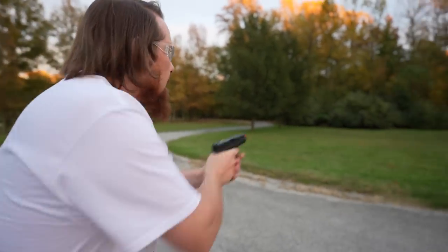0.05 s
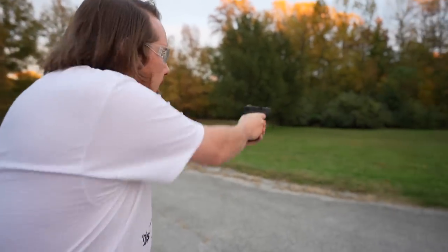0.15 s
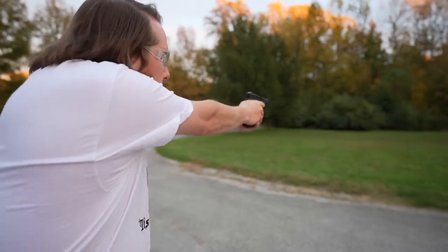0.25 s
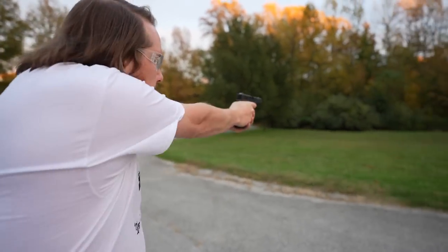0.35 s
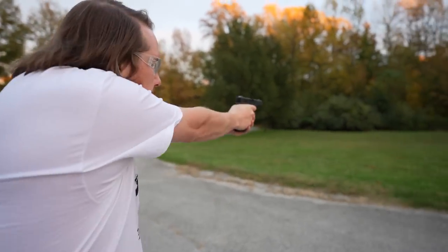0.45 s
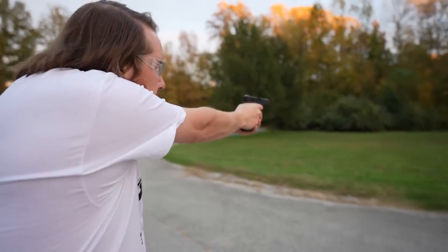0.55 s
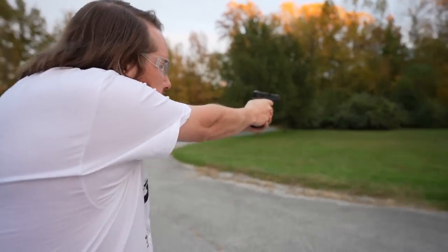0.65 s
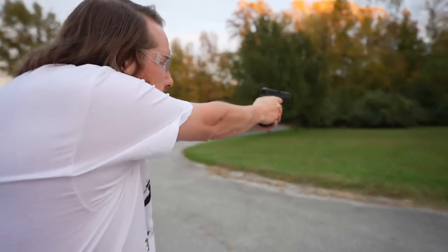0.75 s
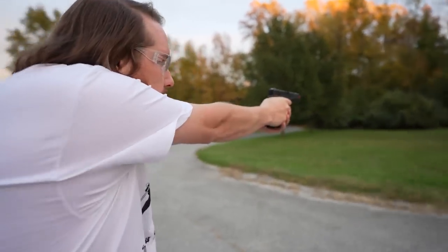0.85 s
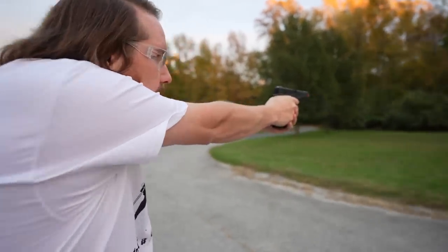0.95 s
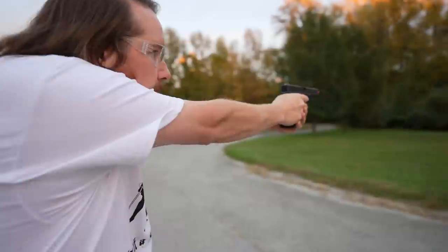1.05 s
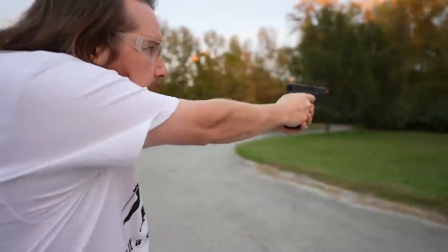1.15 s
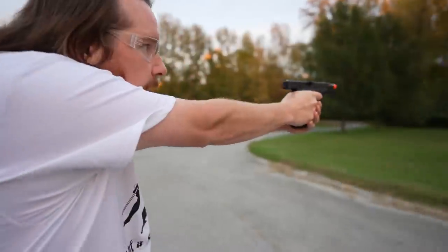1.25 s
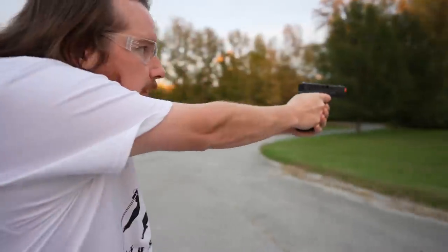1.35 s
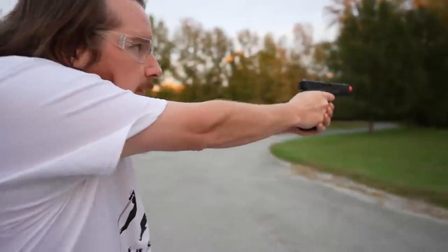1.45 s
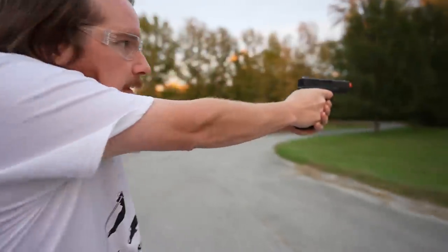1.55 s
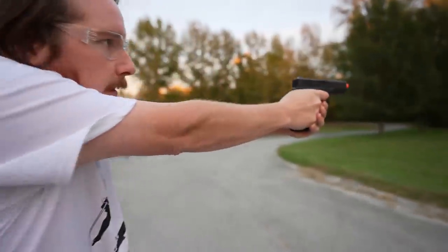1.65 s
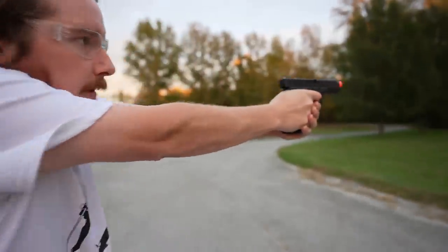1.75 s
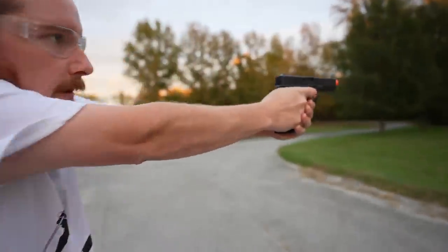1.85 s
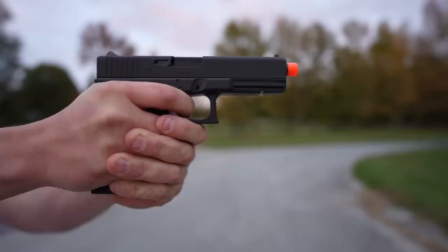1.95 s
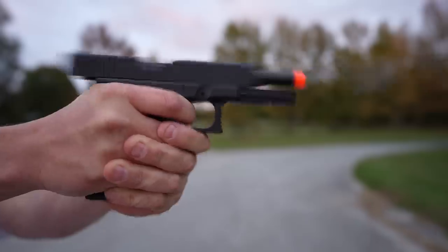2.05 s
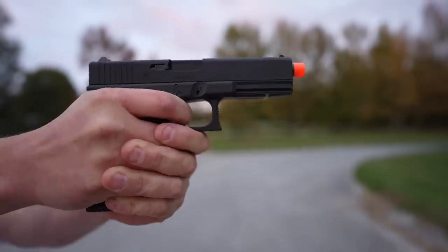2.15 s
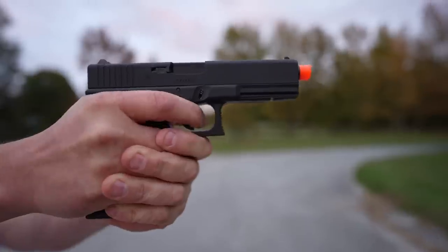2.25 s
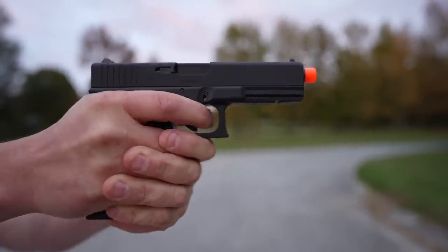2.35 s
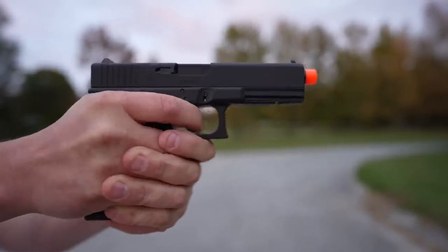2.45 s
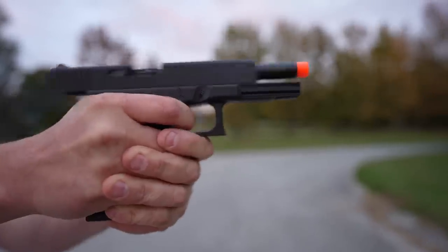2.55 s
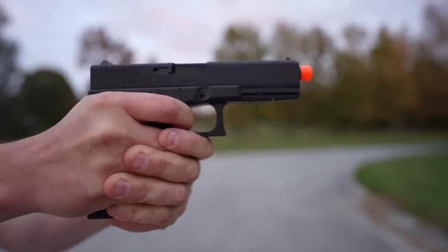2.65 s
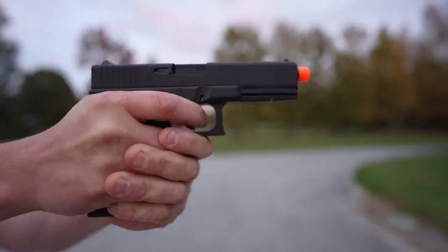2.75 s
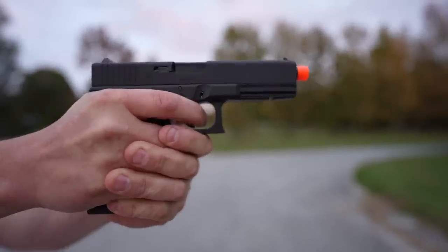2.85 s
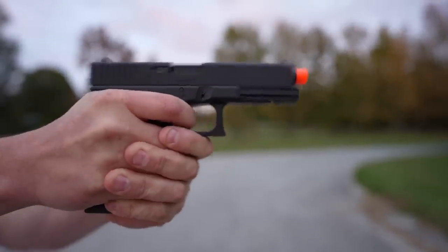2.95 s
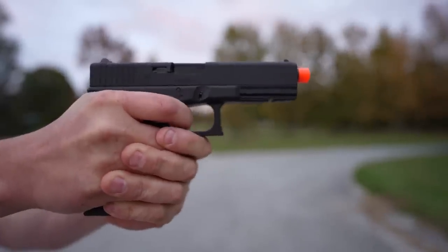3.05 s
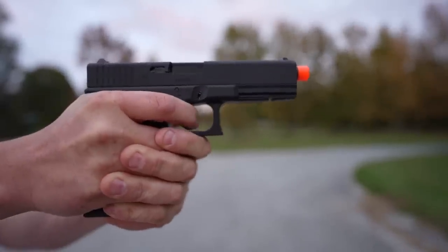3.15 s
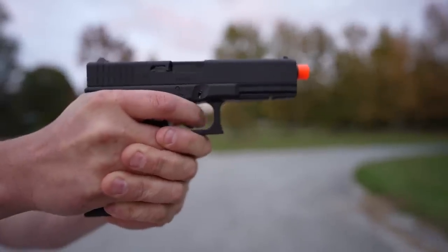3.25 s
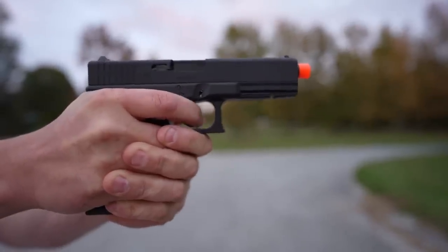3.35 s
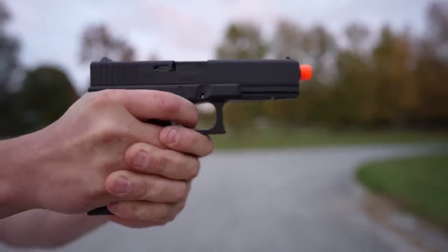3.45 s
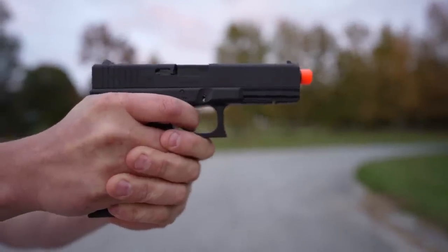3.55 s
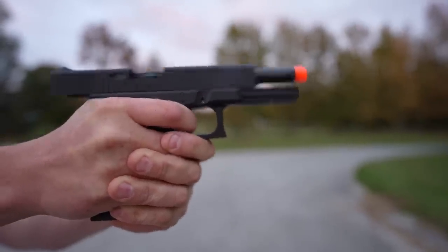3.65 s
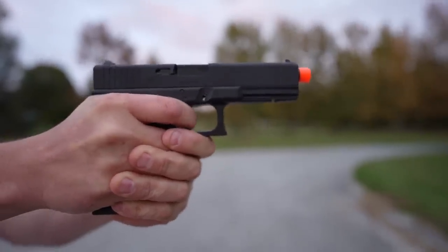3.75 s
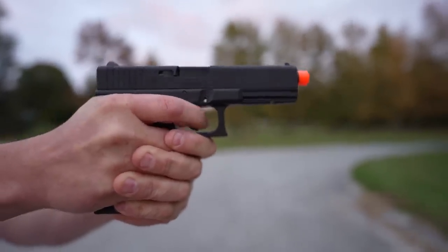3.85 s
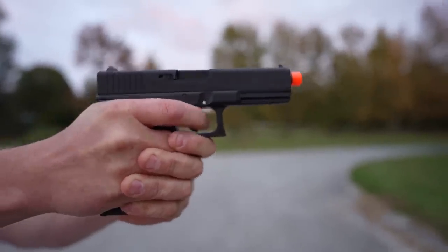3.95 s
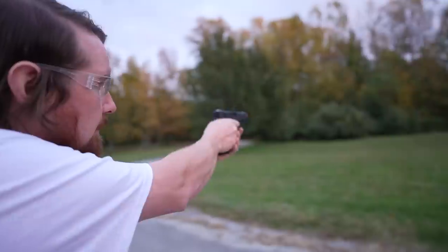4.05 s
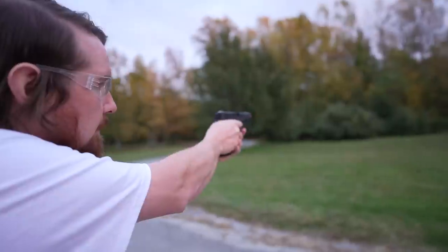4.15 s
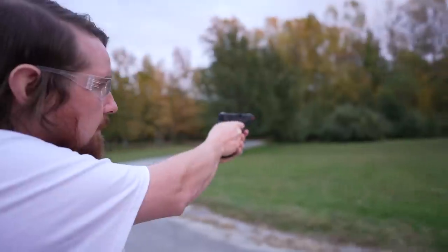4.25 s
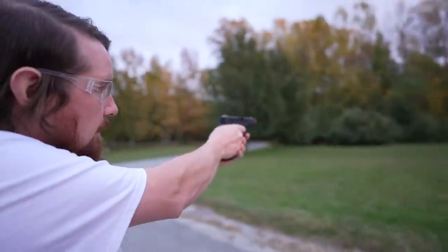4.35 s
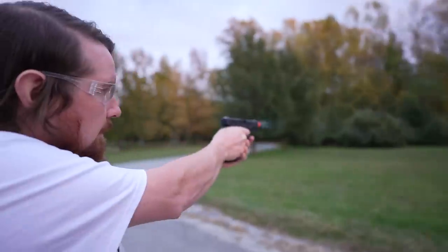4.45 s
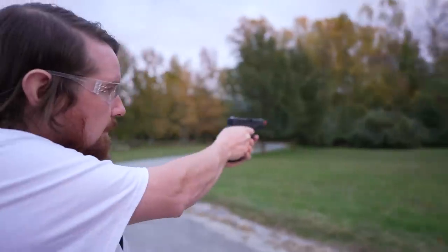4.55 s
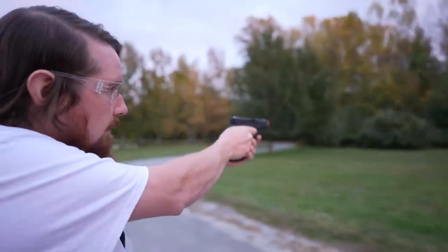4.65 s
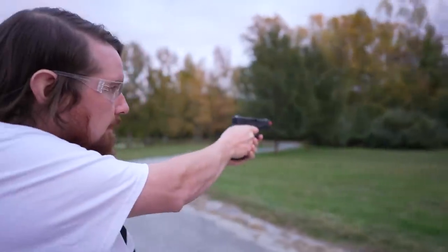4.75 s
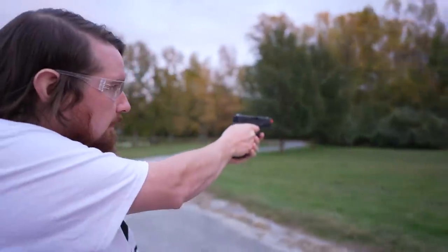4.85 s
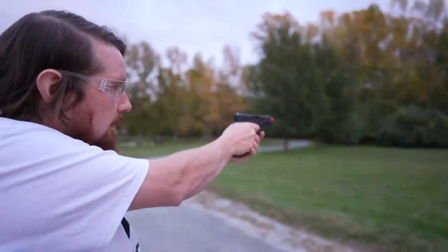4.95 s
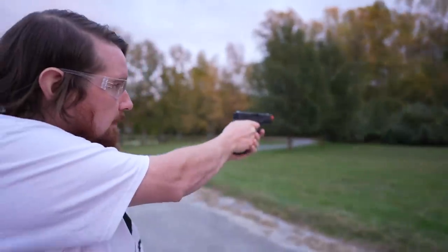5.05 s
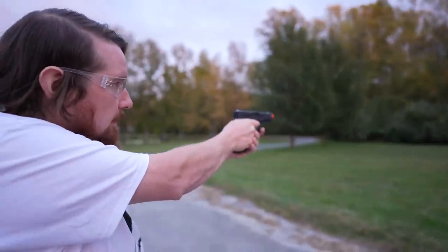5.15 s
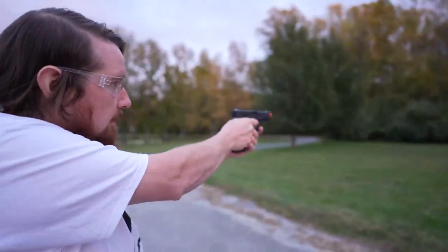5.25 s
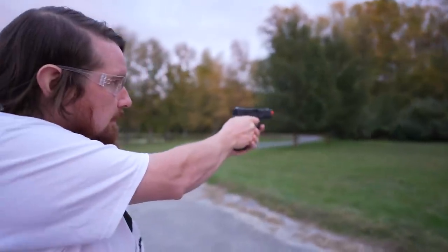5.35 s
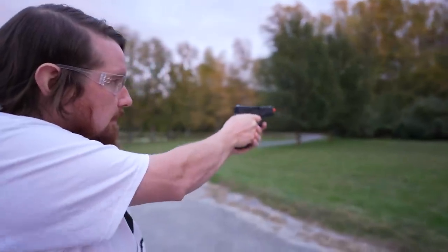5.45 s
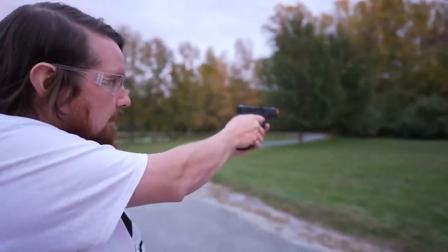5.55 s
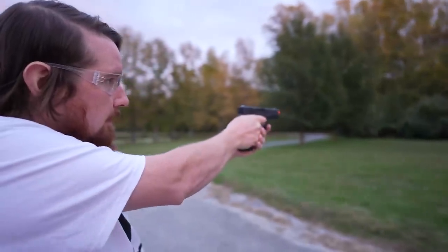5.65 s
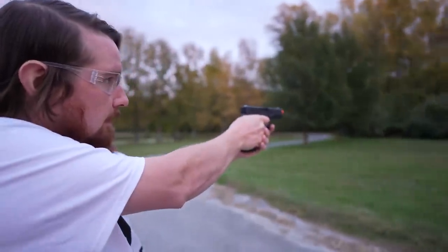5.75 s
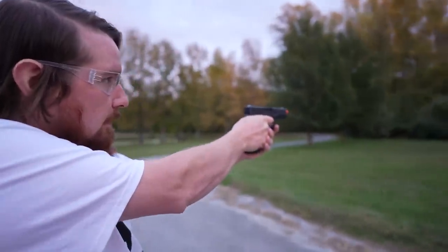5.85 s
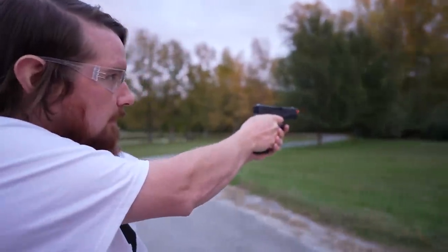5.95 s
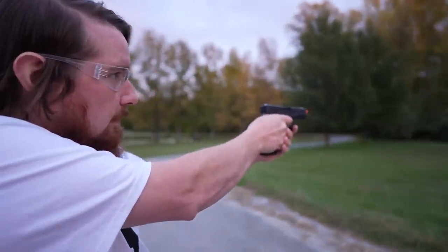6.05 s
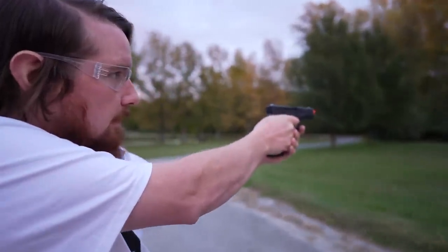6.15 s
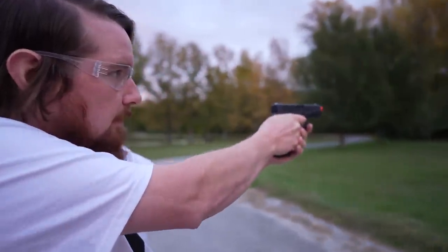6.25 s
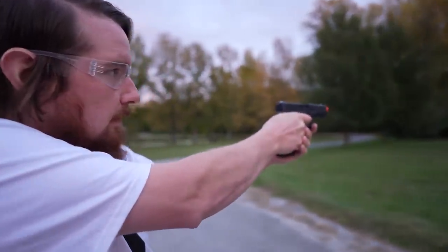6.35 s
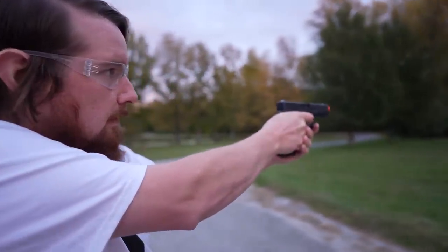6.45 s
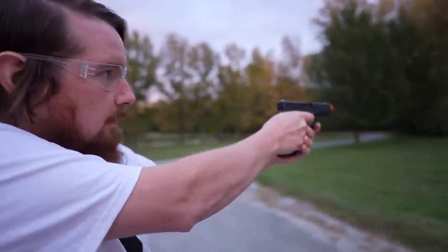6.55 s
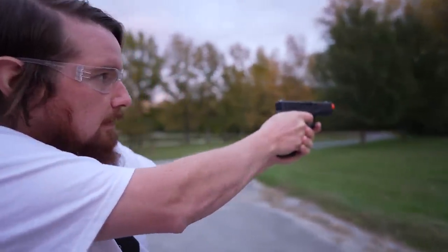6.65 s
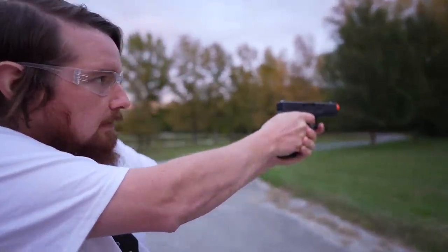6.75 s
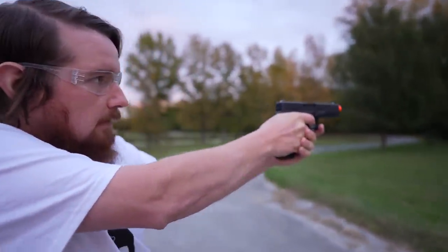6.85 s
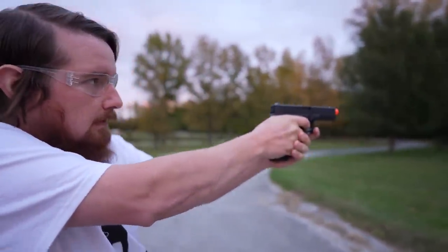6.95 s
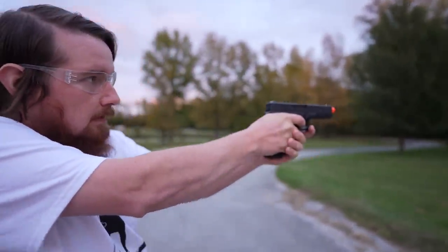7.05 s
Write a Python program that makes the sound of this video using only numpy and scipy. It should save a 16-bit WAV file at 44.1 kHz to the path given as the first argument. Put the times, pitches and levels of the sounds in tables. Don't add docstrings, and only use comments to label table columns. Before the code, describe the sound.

Outdoors on a paved path, cloth rustles softly for about a second over distant traffic. A gas airsoft pistol then fires five quick sharp pops, each followed at once by metal slide clatter and a hard shut. Eight more shots come at wider, uneven gaps, with crisp trigger reset clicks between them. A faint scattered tail returns from trees. The microphone is close, and the loudest peaks overload slightly.

```python
import sys
import numpy as np
from scipy import signal
from scipy.fft import rfft, irfft
from scipy.io import wavfile
from scipy.ndimage import uniform_filter1d

SR = 44100
rng = np.random.default_rng(int(sys.argv[2]) if len(sys.argv) > 2 else 0)


def to_linear_factor(level_db):
    exponent = np.asarray(level_db, float) / 20
    return 10 ** exponent


def transcribe(u):
    v = np.clip(np.atleast_2d(u).T, -1, 1)
    q = np.round(v * 32767).astype(np.int16)
    wavfile.write(sys.argv[1], SR, q)


N = 313110

# f/Hz, level/dB, t60/s
SLIDE_MODES = [(2003, -2.5, 0.033), (2840, -11, 0.078), (3465, -2, 0.036), (3788, 3.5, 0.037),
               (4920, -5.5, .02), (5570, -4.5, 0.021), (6277, -6, 0.032), (6900, -19, .03),
               (9600, -15, 0.026), (12300, -16.5, 0.022)]
# f/Hz, level/dB
CRACK = [(1000, -4), (1800, -1), (3500, 5.5), (5000, -5), (7000, -12)]
# f/Hz, level/dB
SIZZLE = [(4500, -8), (6500, 2), (9500, 1.5), (13000, -5.5), (16000, -5.5)]
# f/Hz, level/dB
THUD = [(350, -39.5), (700, -6.5), (1130, 6), (1500, -3.5), (2400, -9.5)]
# t/s, crack level/dB, frame thud/dB re crack, extra sizzle/dB, extra ring/dB
HAMMERS = [(0.9543, -17, -25.5, 0, 0), (1.2845, -14.5, -34, 0, 0), (1.5233, -17, -9, 0, 0),
           (1.7633, -18, -4, 0, 0), (2.1104, -13, -16.5, 0, 0), (2.5841, -10, -30, 0, 0),
           (3.0253, -15.5, -14, 0, 0), (3.6887, -9, -6, 0, 0), (4.036, -24, -15, 0, 0),
           (4.5241, -20, -11.5, 0, 0), (5.0381, -20.5, -23.5, 0, 0), (5.4523, -16, -19.5, 0, 0),
           (6.2578, -17, -3.5, 0, 0)]

GRIPPED_S = 0.021
BARREL_OPEN_S = 0.023
SLIP_S = 0.004


def evened(x):
    return x / np.sqrt(np.mean(x ** 2) + 1e-20)


def read(points, hz):
    f, value = np.transpose(points)
    return np.interp(np.log(hz + 1), np.log(f + 1), value)


def add(mix, s, sound):
    part = mix[round(s * SR):][:len(sound)]
    part += sound[:len(part)]


def noise(points, size, slope_db=12):
    hz = np.fft.rfftfreq(size, 1 / SR) + 1
    octaves_beyond = np.log2(np.maximum(points[0][0] / hz, 1) * np.maximum(hz / points[-1][0], 1))
    gain = to_linear_factor(read(points, hz) - slope_db * octaves_beyond)
    return evened(irfft(rfft(rng.standard_normal(size)) * gain, size))


def burst(points, envelope):
    x = noise(points, size=len(envelope)) * envelope
    return x * np.linalg.norm(envelope) / np.linalg.norm(x)


def resonate(x, hz, width):
    return signal.lfilter(*signal.iirpeak(hz, hz / width, SR), x)


def ring(modes, t, spread_db):
    hz, db, t60 = np.transpose(modes)[:, :, None]
    detune, phase, level = rng.standard_normal((3, len(modes), 1))
    turns = hz * (1 + 0.022 * detune) * t + 0.23 * phase
    return (to_linear_factor(db + spread_db * level - 60 * t / t60) * np.sin(2 * np.pi * turns)).sum(0)


def blast(t, rise, width):
    u = np.maximum(t - rise, 0) / width
    return np.minimum(t / rise, 1) * (1 - u) * np.exp(-0.55 * u)


def loaded_pop(db, travel, echo_db, hz):
    t = np.arange(1400) / SR
    u = np.minimum(t / travel, 1)
    after = np.maximum(t - travel, 0)
    low = np.cos(2 * np.pi * hz * 1.04 * (t - travel + 0.0016))
    low = low * (1 - 0.7 * u ** 4) * to_linear_factor(-60 * after / 0.004)
    orders = 0
    for k, order_db in ((2.03, -5), (2.85, -2.5), (4.15, -4.5)):
        orders = orders + to_linear_factor(order_db) * np.cos(2 * np.pi * k * hz * (t - travel + 0.0001))
    high = orders * (0.25 + 0.8 * u ** 2) * to_linear_factor(-60 * after / 0.005)
    snap = burst(SIZZLE, (t > travel) * to_linear_factor(-3.5 - 60 * after / 0.0025))
    leak = burst(CRACK, to_linear_factor(-2) * np.exp(-((t - travel + 0.0002) / 0.00096) ** 2))
    start = np.minimum(t / 0.0007, 1) ** 2
    echoes = 0
    for k in range(5):
        lag = after - 0.0024 - 0.00205 * k
        echoes = echoes + to_linear_factor(echo_db - 6.5 * k) * np.exp(-(lag / 0.00007) ** 2)
    barrel = to_linear_factor(echo_db - 10 - 60 * after / 0.03) * np.sin(2 * np.pi * 490 * after)
    barrel = barrel / (1 + (after / BARREL_OPEN_S) ** 8)
    return to_linear_factor(db) * (start * (low + high) + snap + leak) + echoes + barrel


def empty_pop(db, hiss_db, hz, muzzle_db):
    t = np.arange(2048) / SR
    late, later = np.maximum(t - 0.0024, 0), np.maximum(t - 0.0032, 0)
    slug = blast(t, rise=0.0001, width=0.0008) * (late == 0)
    rebound = to_linear_factor(-13.5 - 60 * late / 0.011) * np.sin(2 * np.pi * 340 * late)
    echo = to_linear_factor(-5.0 - 60 * later / 0.0079) * np.sin(2 * np.pi * 3150 * later)
    muzzle = to_linear_factor(muzzle_db - 60 * t / 0.03) * (1 - np.exp(-t / 0.001)) * np.sin(2 * np.pi * 2050 * t)
    jet = evened(resonate(rng.standard_normal(len(t)), 6900, 2200))
    jet = jet * np.exp(-((t - 0.0012) / 0.00065) ** 2)
    pipe = 0
    for k in range(1, 6):
        pipe = pipe + to_linear_factor(-4.5 - 7.6 * k - 60 * t / 0.072) * np.cos(2 * np.pi * k * hz * (t - 0.0033))
    pipe = pipe * (late > 0) / (1 + (t / BARREL_OPEN_S) ** 8)
    return to_linear_factor(db) * (slug + rebound + echo + muzzle + pipe) + to_linear_factor(hiss_db) * jet


def pops():
    # muzzle exit t/s, pop level/dB, barrel travel/s, barrel echo level/dB, barrel f/Hz
    loaded = [
        (0.9592, -3.5, 0.0025, -8, 850),
        (1.289, -1.5, 0.0021, -4.5, 920),
        (1.5278, -1.5, 0.0022, -4.5, 846),
        (1.767, -1, 0.0019, -6.5, 828),
        (2.1171, 0.5, 0.0032, -13, 937),
        (4.5297, 0.5, 0.0019, -13, 784),
        (5.4576, -2.5, 0.0027, -12, 776),
        (6.264, -2.5, 0.0027, -15, 784),
    ]
    # t/s, push level/dB, jet hiss level/dB, barrel f/Hz, muzzle ring level/dB
    empty = [
        (2.5858, 2, -8, 528, -20),
        (3.0276, 2, -0.5, 503, -18),
        (3.6905, 1, -14.5, 503, -16),
        (4.0378, -1.5, -9, 480, -7),
        (5.0402, -1.5, -11, 473, -8),
    ]
    out = np.zeros(N)
    for s, db, travel, echo_db, hz in loaded:
        add(out, s - travel, loaded_pop(db, travel, echo_db, hz))
    for s, *row in empty:
        add(out, s, empty_pop(*row))
    return out


def knock(db, sizzle_db, thud_db, ring_db, t60, air_db):
    # f/Hz, level/dB
    air = [(9000, -10.5), (12500, 0.5), (15500, -11.5)]
    t = np.arange(4096) / SR
    t60 = np.clip(t60, 0.003, 0.05)
    rise = (1 - np.exp(-t / 0.00022)) / (1 + (t / GRIPPED_S) ** 8)
    heavy = rise * (1 - np.exp(-(t / 0.0005) ** 2))
    linger = to_linear_factor(-13.0 - 22 * t / t60)
    crack = burst(CRACK, heavy * (to_linear_factor(1.0 - 62 * t / t60) + linger))
    fizz = rise * (to_linear_factor(-75 * t / t60) + linger)
    sizzle = burst(SIZZLE, fizz * to_linear_factor(sizzle_db + 0.5))
    sizzle += burst(air, fizz * to_linear_factor(sizzle_db + air_db))
    thud = burst(THUD, heavy * to_linear_factor(thud_db + 4.0 - 45 * t / t60))
    ringing = heavy * to_linear_factor(min(ring_db, 4) - 1.5) * ring(SLIDE_MODES, t, spread_db=1.5)
    return to_linear_factor(db) * (crack + sizzle + thud + ringing)


def knocks():
    # t/s, crack level/dB, frame thud/dB re crack, extra sizzle/dB, extra ring/dB
    unlocks = [(0.971, -16, -6, 4, -3), (1.3009, -15.5, -8, 0, 0), (1.5426, -14.5, -13, 0, 0),
               (1.784, -15, -18, 0, 0), (2.1308, -14.5, -21, 0, 0), (2.604, -11.5, -6.5, 3, -4),
               (3.0459, -11, -22, 0, 0), (3.7095, -14, -14, -2, -6), (4.0585, -9.5, -20, 0, -8),
               (4.5456, -13, -5, 3, -3), (5.06, -11, -13.5, 3, -4), (5.4751, -14, -4, 4, 0),
               (6.282, -13, -13, 0, -3)]
    rear_stops = [(0.9775, -12, -6, 0, 0), (1.3076, -9.5, -6, 0, 3), (1.551, -12, -11.5, 3, 3),
                  (1.7905, -14, -14.5, 4, -4), (2.1382, -13, -6, 0, 0), (2.6083, -17.5, 1.5, 0, 0),
                  (3.0539, -15.5, -9.5, 0, 0), (3.7193, -13, -24.5, 0, 0), (4.0686, -12, -3, 2, 0),
                  (4.5541, -9, -13, 0, 0), (5.0704, -9.5, -2, 0, 0), (5.4865, -6.5, -23, 0, 0),
                  (6.2888, -14, -27, 3, 0)]
    rebounds = [(0.993, -11.5, -3.5, 3, 0), (1.3212, -14.5, -3, 5, 3), (1.5632, -18, 3, 5, 3),
                (1.7954, -10, -14, 8, 8), (1.8065, -14, -2, 6, 3), (2.1563, -28, -21.5, 0, 0),
                (2.6412, -22, -3.5, 0, 0), (3.0508, -16.5, -6.5, 0, 0), (3.0608, -15, -32, 0, 0),
                (3.7468, -21, -12, 8, 0), (4.0764, -16, -22, 0, 0), (4.0854, -10.5, -5, 5, 0),
                (4.5503, -14, -17, 5, 0), (5.0853, -16, 2.5, 6, 3), (5.5016, -15.5, 1, 8, 3),
                (6.3068, -12.5, 0, 8, 3), (6.3155, -18, -10, 0, 0), (0.9625, -13, -29, 0, 0),
                (1.0015, -20.5, 2, 0, 3), (1.3368, -8, -13, 0, 0), (1.8202, -6.5, -26, 0, 0),
                (4.047, -18, -9, 0, 0), (5.0493, -14.5, -13, 0, 0), (2.1677, -16, -13, 0, 0)]
    spring_slaps = [(1.332, -23, 8, 0, 0), (1.5763, -9.5, -26.5, 0, 0), (1.8156, -22, 6, 0, 0),
                    (3.0357, -19, -8, 8, -5), (3.725, -19, -24, -2, 0), (5.0935, -23.5, 8, 0, 0),
                    (5.4813, -24, -16, 0, 0), (5.4967, -26, -14.5, 0, 0), (6.296, -10.5, -21, 4, 0),
                    (6.3225, -20, -3, 0, 0), (1.5732, -20, 3, 0, -5), (1.5345, -22, -10, 5, -5),
                    (4.5362, -22, -12, 2, -5), (6.2708, -23, -10, 5, -5), (4.0806, -20, -10, 3, -3),
                    (5.0804, -21, -6, 8, -5), (5.463, -20, -10, 5, -5), (4.5812, -24, -10, 8, -5),
                    (1.3425, -18, -10, 0, -5), (1.35, -23, -10, 8, -5), (1.0148, -24, -10, 3, -3),
                    (6.3455, -20, -25, -5, 2), (5.5105, -24, -2, 0, -5)]
    chambers = [(1.0173, -16, -15.5, 0, 4), (1.5895, -19, -9.5, -3, 0), (2.1759, -21, -11, -5, 0),
                (2.6534, -21.5, -16, -3, 0), (3.0835, -20, -13, 0, 0), (3.7495, -27, -21.5, 0, 0),
                (4.0992, -15, -8, -4, 0), (4.5844, -14, -3, 0, 0), (5.1023, -14, -3, -3, 0),
                (5.5186, -13, -11, 0, 0), (6.3272, -13, -8, 0, 0)]
    shuts = [(1.0242, -2.5, -20.5, 0, 2), (1.3584, -5, -19.5, 0, 0), (1.5974, -3.5, -28.5, 0, 0),
             (1.8409, -4, -17.5, 0, 0), (2.1794, -3, -11, 0, 0), (2.6579, -5.5, -12, 3, 0),
             (3.0981, -3, -12, 0, 0), (3.7588, -3.5, -18.5, 0, 0), (4.1074, -5, -24, 0, 0),
             (4.5934, -3.5, -6.5, 0, 0), (5.11, -5, -12, 0, 0), (5.5258, -3.5, -32.5, 0, 0),
             (6.3354, -4.5, -14, 0, 0)]
    far_air_db, near_air_db = -13.5, 3.5
    out = np.zeros(N)

    def strike(rows, sizzle_db, ring_db, t60):
        for s, db, thud_db, bright_db, more_db in rows:
            air_db = near_air_db if 2 < s < 4 else far_air_db
            add(out, s, knock(db, sizzle_db + bright_db, thud_db, ring_db + more_db, t60, air_db))

    strike(HAMMERS, sizzle_db=-0.4, ring_db=-9, t60=0.0078)
    strike(unlocks, sizzle_db=-8.5, ring_db=-0.5, t60=0.012)
    strike(rear_stops, sizzle_db=-3, ring_db=-4.5, t60=0.0091)
    strike(rebounds, sizzle_db=-14, ring_db=-12, t60=0.016)
    strike(spring_slaps, sizzle_db=-14.5, ring_db=-0.22, t60=0.0099)
    strike(chambers, sizzle_db=-6, ring_db=-8, t60=0.016)
    strike(shuts, sizzle_db=-4.5, ring_db=-5, t60=0.011)
    for s, db, thud_db, *_ in shuts:
        add(out, s - 0.0017, knock(db - 15, -6.5, thud_db, -5.5, 0.0073, far_air_db))
    return out


def slide_travel(puff_db, hiss_db, scrape_db, length, opening):
    t = np.arange(-opening, length + 0.03, 1 / SR)
    size = len(t)
    roughness = evened(uniform_filter1d(rng.standard_normal(size), 30))
    grit = rng.standard_normal(size) * to_linear_factor(2.8 * roughness)
    buzz = sum(to_linear_factor(db) * evened(resonate(grit, hz, 190)) for hz, db, _ in SLIDE_MODES)
    frame = noise(THUD, size=size) + noise(CRACK, size=size)
    rub = to_linear_factor(-3) * evened(buzz) + to_linear_factor(-13) * evened(grit) + to_linear_factor(-9) * frame
    shut, vent = np.maximum(t - length, 0), np.maximum(t, 0)
    pressure = np.minimum((t - t[0]) / 0.0093, 1) * to_linear_factor(-3 * (t < 0))
    pressure = pressure * to_linear_factor(-60 * shut / 0.1) / (1 + (shut / GRIPPED_S) ** 8)
    hiss = noise(SIZZLE, size=size, slope_db=4.5) * (t > 0) * np.exp(-(vent / 0.0062) ** 3)
    puff = blast(vent, rise=0.00034, width=0.00033)
    return to_linear_factor(scrape_db) * pressure * rub + to_linear_factor(puff_db) * puff + to_linear_factor(hiss_db) * hiss


def slides():
    # t/s, puff level/dB, hiss level/dB, scrape level/dB, slide shut t/s
    cycles = [(0.9747, -7, -18.5, -28.5, 1.025), (1.304, -5, -18.5, -24, 1.359),
              (1.547, -6, -13.5, -23, 1.598), (1.7904, -6, -17, -24.5, 1.841), (2.135, -5, -18, -27, 2.18),
              (2.6082, -4.5, -13, -21.5, 2.659), (3.051, -3.5, -15.5, -25, 3.099),
              (3.7146, -7.5, -12.5, -22.5, 3.759), (4.0637, -5, -16.5, -23, 4.108),
              (4.55, -6.5, -17, -23.5, 4.594), (5.0655, -7, -21.5, -20.5, 5.111),
              (5.4808, -5, -15, -22, 5.526), (6.2888, -6, -16, -25, 6.336)]
    out = np.zeros(N)
    for (s, *levels_db, shut), (struck, *_) in zip(cycles, HAMMERS):
        add(out, struck, slide_travel(*levels_db, length=shut - s, opening=s - struck))
    return out


def spring_note(length, db, hz):
    t = np.arange(0, length + 0.004, 1 / SR)
    shape = np.clip(np.minimum(t / 0.0018, (t[-1] - t) / 0.005), 0, 1) * to_linear_factor(-90 * t)
    wobble = evened(uniform_filter1d(rng.standard_normal(len(t)), 130))
    return to_linear_factor(db + 2.2 * wobble) * shape * np.sin(2 * np.pi * hz * t + 0.49 * wobble)


def recoil_spring():
    # t/s, length/s, level/dB, f/Hz
    notes_sung = [(1.806, 0.02, -16, 3850), (2.14, 0.011, -16, 1940), (2.1535, .007, -20, 2910),
                  (2.609, 0.023, -20.5, 1973), (3.06, 0.032, -22, 1967), (3.722, 0.025, -22, 3860),
                  (5.111, 0.011, -20.5, 3710), (5.487, .006, -12, 3730), (6.333, 0.0057, -12.5, 2053),
                  (1.555, 0.019, -18.5, 3850), (1.31, .011, -18, 3850), (1.577, .008, -15, 3800),
                  (4.556, .016, -20, 3800), (6.297, .008, -20, 6300), (6.342, .01, -20, 3750),
                  (1.025, .012, -17, 3750), (2.598, .03, -25, 3700), (1.565, .03, -30, 6300),
                  (4.088, .016, -21, 3800), (5.085, .007, -26, 9500), (4.11, .045, -52, 7000),
                  (4.21, .2, -61, 7000), (2.668, .02, -43, 6300), (3.108, .03, -46, 6300),
                  (.98, .014, -28, 2000), (.988, .018, -22, 3750), (1.026, .022, -35, 6300)]
    out = np.zeros(N)
    for s, *row in notes_sung:
        add(out, s, spring_note(*row))
    return out


def tick(db, sizzle_db, hz=2900, bar_db=3):
    # f/Hz, level/dB, t60/s
    bar_modes = [(1290, -9, 0.0026), (3400, -6, 0.011), (5400, -18.5, 0.0089), (6820, -13.5, 0.0036)]
    t = np.arange(1024) / SR
    after = np.maximum(t - SLIP_S, 0)
    sizzle = burst(SIZZLE, to_linear_factor(sizzle_db - 6.0 - 60 * after / 0.0068) * (t > SLIP_S))
    crack = burst(CRACK, to_linear_factor(-6.5 - 60 * after / 0.0045) + to_linear_factor(-17.0 - 60 * after / 0.026))
    modes = [(hz, -0.5, 0.005)] + [(f, mode_db + bar_db, t60) for f, mode_db, t60 in bar_modes]
    ringing = ring(modes, after, spread_db=2.2)
    snap = (1 - np.exp(-after / 0.00012)) * (ringing + sizzle + crack)
    slip = to_linear_factor(-15) * (t < SLIP_S) * t / SLIP_S * crack
    return to_linear_factor(db + 5.5) * signal.lfilter(*signal.butter(2, 780, "high", fs=SR), snap + slip)


def trigger():
    # t/s, level/dB, sizzle/dB re tick, lowest mode f/Hz, bar ring/dB re tick
    resets = [(1.1389, -23, -7, 2180, 1), (1.405, -21, -6, 2160, 0), (1.6414, -17, -13, 2570, 0),
              (1.8634, -20, -13, 2420, 0), (2.2906, -9.5, -10, 2280, 0), (2.7584, -10.5, -3, 2100, 2),
              (3.2105, -8, -4, 2340, 0), (3.8851, -9, -4, 1990, 5), (4.2415, -20.5, -15.5, 2350, 0),
              (4.7369, -15, -14, 2600, 1), (5.252, -13, -15, 2560, 0), (5.6451, -18.5, -11, 2040, 3),
              (6.4533, -23, -6, 2560, 0)]
    # t/s, level/dB
    take_ups = [(0.894, -40.5), (1.2421, -35), (1.4788, -43), (1.4886, -29), (1.501, -40), (1.7119, -43.5),
                (1.7261, -34), (2.0807, -38), (2.108, -23), (2.5388, -29), (2.5469, -19.5), (2.5594, -36.5),
                (2.5648, -30.5), (2.9794, -26), (2.9881, -18), (3.0032, -27), (3.6301, -32.5),
                (3.6646, -28), (3.6751, -30), (4.4866, -35), (4.505, -32.5), (5.0122, -32), (5.4082, -37.5),
                (5.4154, -32.5), (5.4277, -43.5), (5.4317, -35), (6.2242, -35), (6.2318, -28.5),
                (6.2471, -33)]
    # t/s, level/dB
    shifts = [(1.1545, -32), (1.8773, -26), (1.9796, -37), (2.241, -39), (2.3131, -38), (2.7444, -32),
              (2.783, -35.5), (3.1668, -29), (3.4997, -40), (3.8291, -39.5), (6.4238, -46), (7.067, -47.5)]
    out = np.zeros(N)
    for s, db, sizzle_db, hz, bar_db in resets:
        add(out, s - SLIP_S, tick(db, sizzle_db, hz, bar_db))
        add(out, s - SLIP_S + 0.0045, tick(db - 21.5, sizzle_db=-20))
    for rows, sizzle_db in ((take_ups, -21), (shifts, -15)):
        for s, db in rows:
            add(out, s - SLIP_S, tick(db, sizzle_db))
    return out


def pistol():
    out = pops() + knocks() + slides() + recoil_spring() + trigger()
    return signal.lfilter(*signal.butter(2, 55, "high", fs=SR), out)


def trees(x):
    # f/Hz, t60/s
    far_t60 = [(300, .8), (1500, 1.4), (4000, 1.4), (7000, 1.0), (10000, .55), (15000, .38)]
    # f/Hz, level/dB
    leaves = [(200, -13), (900, -.5), (3800, 1), (5000, .5), (6400, -3), (8000, -1.5), (15000, -2)]
    cut_s = 1.968
    hz, t, z = signal.stft(x, SR, nperseg=256)
    power = uniform_filter1d(abs(z) ** 2, size=3, axis=0)
    lag = t[:400]
    far = to_linear_factor(-60 * lag / read(far_t60, hz)[:, None]) ** 2
    bushes = to_linear_factor(5 - 60 * lag / 0.2) ** 2
    onset = (1 - np.exp(-lag / 0.018)) * to_linear_factor(read(leaves, hz))[:, None]
    decay = (far + bushes) * onset ** 2
    tail = 0
    for part in (t < cut_s, t >= cut_s):
        tail = tail + part * signal.fftconvolve(power * part, decay, axes=1)[:, :len(t)]
    a, b = rng.standard_normal((len(t), len(hz), 2)).T
    patches = uniform_filter1d(uniform_filter1d(a * b, size=9, axis=0), size=7, axis=1)
    tail = tail * to_linear_factor(2.2 * evened(patches)) ** 2
    return signal.istft(np.sqrt(abs(tail)) * (a + 1j * b), SR, nperseg=256)[1][:N]


def grip():
    # t/s, level/dB
    creaks = [(.174, -62), (.411, -66), (.918, -55), (3.195, -50), (3.232, -50), (3.243, -52), (3.302, -46),
              (3.356, -55), (3.369, -55), (3.401, -53), (3.416, -54), (3.445, -50), (3.461, -45),
              (3.4995, -46), (3.582, -56), (3.921, -48), (3.95, -54), (4.806, -50), (6.2425, -50),
              (5.022, -54), (2.09, -48), (3.8685, -48), (2.502, -52), (2.735, -52), (2.946, -54)]
    rate_hz, level_db = 45, -62
    t = np.arange(N) / SR
    chance = (rng.random(N) < rate_hz / SR) * (t > 2.7) * (t < 3.55)
    sizes = to_linear_factor(level_db + 3 * rng.standard_normal(N)) * chance
    for s, db in creaks:
        add(sizes, s, to_linear_factor([db]))
    skin = noise([(5000, -8), (9000, -1), (15000, -1)], size=N)
    return skin * signal.lfilter([1], [1, -np.exp(-1 / (0.0012 * SR))], sizes)


def clothes():
    # t/s, level/dB
    rustle_db = [
        (0, -61.5),
        (.2, -59),
        (.4, -60),
        (.9, -61),
        (.95, -61),
    ]
    t = np.arange(N) / SR
    rustle = noise([(3300, 15.0), (5200, -1), (15000, -24)], size=N)
    rustle = rustle * to_linear_factor(np.interp(t, *np.transpose(rustle_db), right=-86) + 5.0)
    swish = to_linear_factor(-70) * np.exp(-((t - 0.2) / 0.09) ** 2)
    return rustle + noise([(5000, -1), (15000, -4)], size=N) * (swish + to_linear_factor(-81))


def traffic():
    # f/Hz, density/dB per Hz
    wash = [(25, 2.5), (60, -5.5), (170, -3), (330, -28), (520, -16.5), (900, -10.5), (1300, -13),
            (2000, -16.5), (2600, -25), (3800, -22), (5000, -55.5), (8000, -58.5), (16000, -63)]
    # f/Hz, width/Hz, level/dB
    hum = [(95, 8.3, -4), (117, 17, 4)]
    # f/Hz, width/Hz, level/dB
    drone = [(246, 57, 1.5), (345, 14, 1), (647, 45, -4.5), (1240, 70, -3)]
    # t/s, traffic level/dB, hum level/dB, drone level/dB
    course = [(0, -44, -46.5, -70), (.5, -45.5, -48.5, -76.5), (1.9, -45.5, -56, -57.5),
              (1.999, -49.5, -59.5, -50.5), (2.901, -47, -48, -54.5), (3.6, -48, -47.5, -51),
              (4.4, -45, -45, -48.5), (5, -44, -45, -50.5), (5.4, -43.5, -54, -49.5),
              (5.9, -45, -51, -47.5), (6.8, -47.5, -44.5, -44), (7.1, -47.5, -40, -47)]
    t = np.arange(N) / SR
    s, *levels_db = np.transpose(course)
    rumble = noise([(60, 0), (1500, 0)], size=N, slope_db=30)
    layers = [noise(wash, size=N)]
    for modes in (hum, drone):
        orders = sum(to_linear_factor(db) * evened(resonate(rumble, hz, width)) for hz, width, db in modes)
        layers.append(evened(orders))
    out = np.zeros(N)
    for layer, db, lumpy_db in zip(layers, levels_db, (0.8, 1.5, 2.5)):
        lumps = evened(uniform_filter1d(rng.standard_normal(N), 2500))
        out += layer * to_linear_factor(np.interp(t, s, db) + lumpy_db * lumps)
    return out


def scene():
    gun = pistol()
    return (gun + to_linear_factor(-42.0) * trees(gun) + grip() + clothes() + traffic())[None]


def top_cut(x):
    return signal.sosfilt(signal.butter(12, 16670, fs=SR, output="sos"), x)


def record(dry):
    x = signal.lfilter(*signal.butter(2, 45, "high", fs=SR), dry)
    clipped = x / (1 + abs(x / 0.86) ** 8) ** (1 / 8)
    limited = signal.oaconvolve(clipped, signal.firwin(191, 16050, fs=SR)[None], "same")
    return top_cut(limited)


dry = scene()
out = record(dry)
transcribe(out)
```